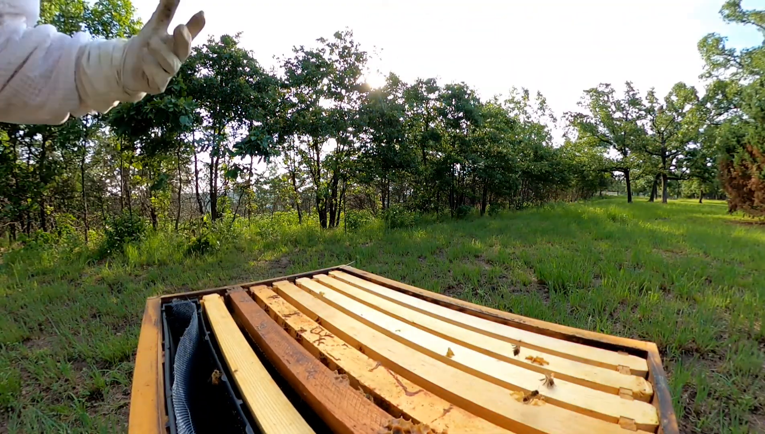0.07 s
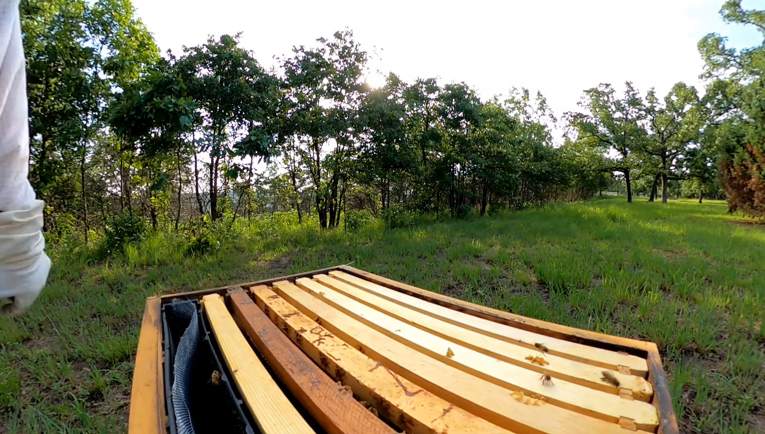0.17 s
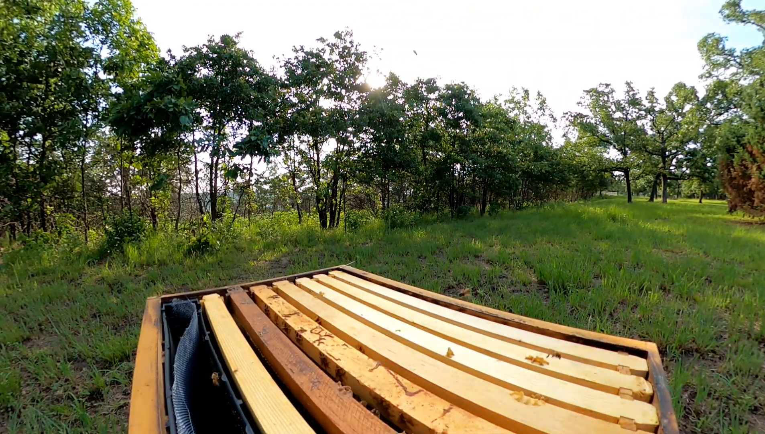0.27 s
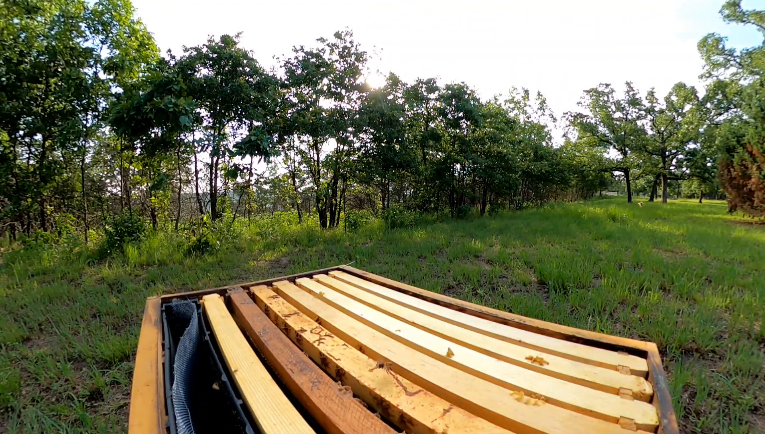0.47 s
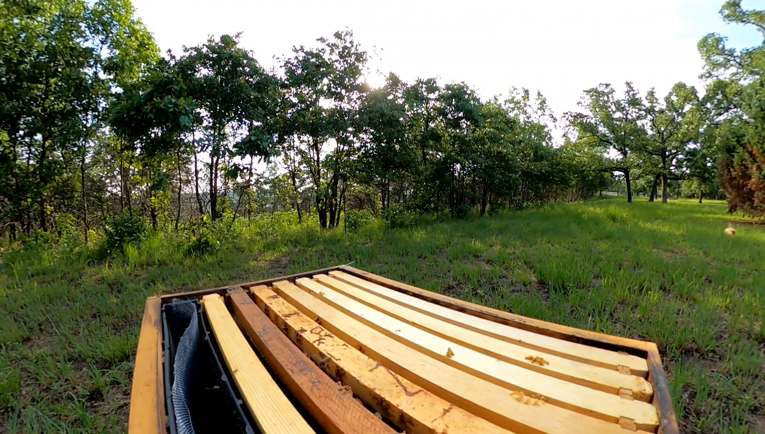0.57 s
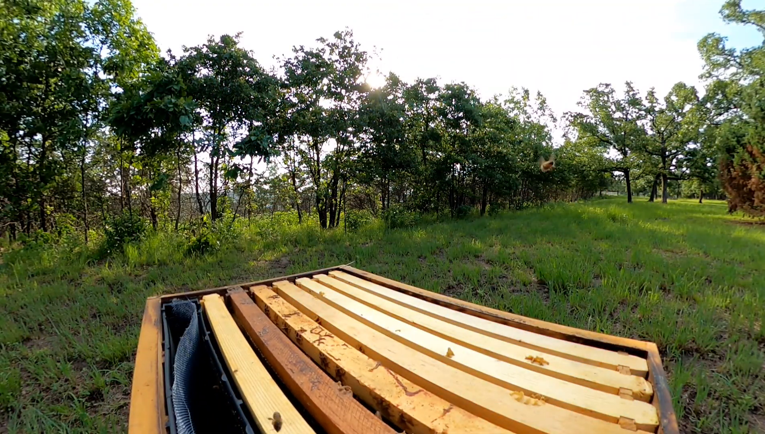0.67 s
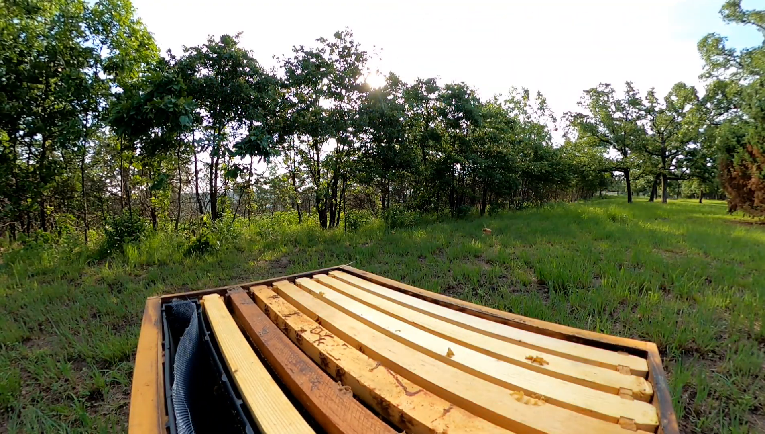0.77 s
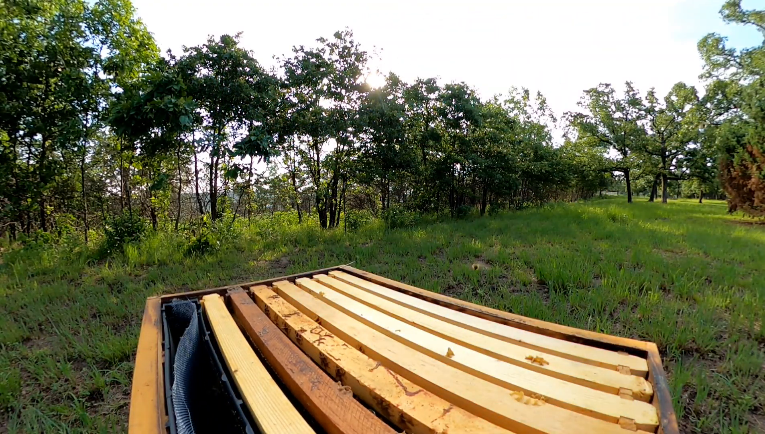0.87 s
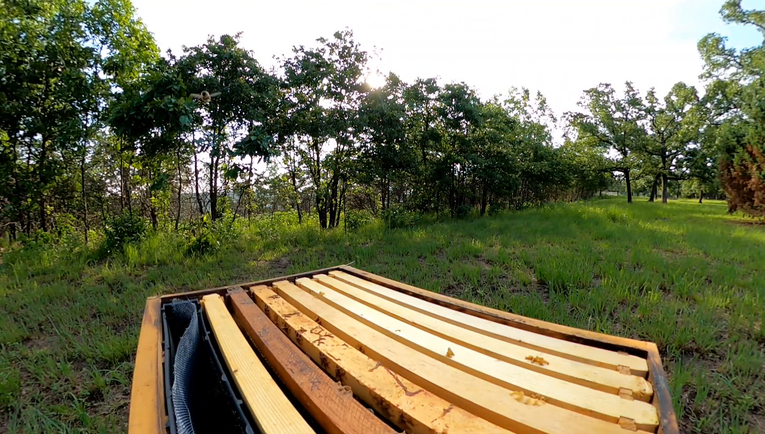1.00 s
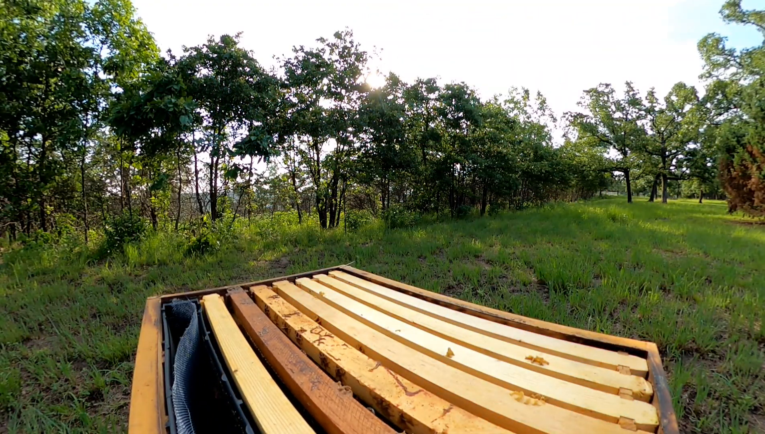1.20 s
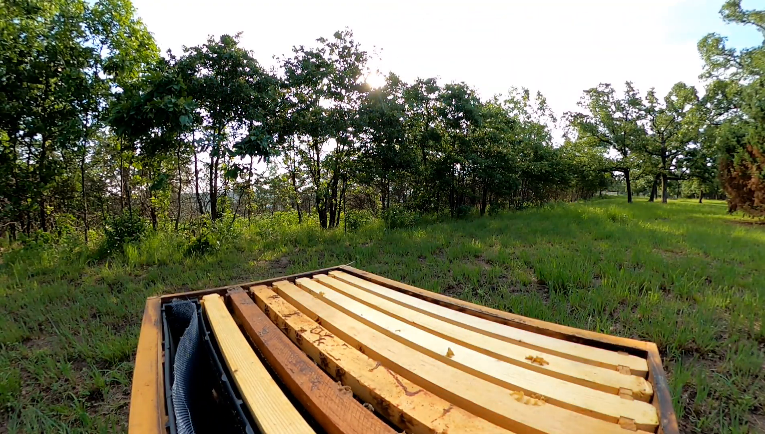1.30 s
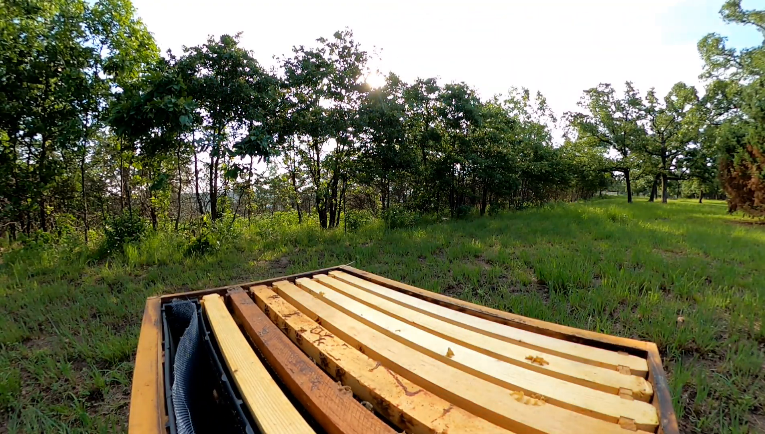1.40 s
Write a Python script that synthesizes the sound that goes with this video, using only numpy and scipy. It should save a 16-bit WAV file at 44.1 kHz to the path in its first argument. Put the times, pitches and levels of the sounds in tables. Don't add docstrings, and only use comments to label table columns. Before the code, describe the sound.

A dense swarm of bees hums and buzzes at an open hive; early on a wooden part lands with a tick and hard hollow knock, then quieter buzzing with faint clicks, outdoors, microphone on the hive rim.

```python
import sys
import numpy as np
from scipy import signal
from scipy.fft import rfft, irfft, next_fast_len
from scipy.io import wavfile
from scipy.ndimage import uniform_filter1d, map_coordinates

SR = 44100
rng = np.random.default_rng(int(sys.argv[2]) if len(sys.argv) > 2 else 0)


def magnitude_from_level(level_db):
    exponent = np.asarray(level_db, float) / 20
    return 10 ** exponent


def wav_record(signal):
    frames = np.transpose(np.atleast_2d(signal))
    bounded = np.clip(frames, -1, 1)
    quanta = np.round(bounded * 32767).astype(np.int16)
    wavfile.write(sys.argv[1], SR, quanta)


N = 63945
NOW = np.arange(N) / SR
CLICK_RISE_S = 0.0005


def unit(x):
    return x / np.sqrt(np.mean(x ** 2, -1, keepdims=True) + 1e-20)


def along(points, hz):
    f, v = np.transpose(points)
    return np.interp(np.log(hz + 1), np.log(f + 1), v)


def curves(rows):
    s, *cols = np.transpose(rows)
    return [np.interp(NOW, s, c) for c in cols]


def wobble(rate):
    return map_coordinates(rng.standard_normal(200), [np.arange(N) * min(rate, 120) / SR])


def filtered(x, response):
    m = next_fast_len(x.shape[-1] + 8192)
    return irfft(rfft(x, m) * response(np.fft.rfftfreq(m, 1 / SR)), m)[..., :x.shape[-1]]


def rush(spectrum, patchy_db):
    z = signal.stft(rng.standard_normal(N), nperseg=512)[2]
    field = uniform_filter1d(rng.standard_normal(z.shape), 8, 0)
    field = uniform_filter1d(field, 10, 1)
    x = signal.istft(z * magnitude_from_level(patchy_db * field / field.std()), nperseg=512)[1][:N]
    return unit(filtered(x, lambda hz: magnitude_from_level(along(spectrum, hz))))


# frequency in Hz, density in dB per Hz.
AIR = [(350, -29), (600, -1), (642, -2), (766, -0.5), (1230, -1), (1760, -9.5), (5360, -24.5),
       (13200, -39.5), (15500, -71)]


def air():
    return magnitude_from_level(6 + 1.2 * wobble(24.8)) * rush(AIR, patchy_db=0.7)


# frequency in Hz, density in dB per Hz.
MURMUR = [(120, -34), (200, 4.5), (320, 2), (440, 9.5), (580, -3.5), (700, -46)]


def murmur():
    return magnitude_from_level(8.5) * rush(MURMUR, patchy_db=3.0)


# frequency in Hz, density in dB per Hz.
RUMBLE = [(12, -39), (22, 0), (54, -0.5), (107, -5.5), (160, -6.5), (210, -14.5), (350, -120)]
# time in seconds, level in dB.
WIND = [(0, -1.5), (.14, -2.5), (.3, 0), (.44, 7.5), (.51, -4), (.62, 2), (.67, -6.5), (.76, 4.5),
        (.86, -0.5), (.98, 0.5), (1.08, 0), (1.2, -4), (1.32, 5), (1.45, -7)]


def rumble():
    gusts_db, = curves(WIND)
    return magnitude_from_level(4.5 + gusts_db + 1.2 * wobble(11.1)) * rush(RUMBLE, patchy_db=2.2)


# multiple of the wing rate, level in dB.
WING = [(1, -1), (2, 3), (3, -15), (4, -29), (5, -19), (6, -11), (7, -18), (8, -23), (10, -29), (14, -51),
        (24, -61)]


def wings(hz, rough, root_db=0):
    turn = 2 * np.pi * np.cumsum(hz * (1 + rough * wobble(60))) / SR
    k = np.arange(1, 25)
    level_db = np.interp(k, *np.transpose(WING)) + root_db * (k == 1)
    level = magnitude_from_level(level_db + 1.5 * rng.standard_normal(len(k)))
    return unit(level @ np.sin(k[:, None] * turn + 2 * np.pi * rng.random((len(k), 1))))


def swarm(count):
    low_hz, high_hz = 166.05, 288.36
    drift, flutter = 0.03, 0.016
    total = 0
    for hz in low_hz + (high_hz - low_hz) * (np.arange(count) + rng.random(count)) / count:
        bee = wings(hz * (1 + drift * wobble(3.5)), flutter)
        total = total + bee * magnitude_from_level(3.5 * wobble(5.28) + 4.5 * wobble(34.7))
    return unit(total)


# time in seconds, twice the wing rate in Hz, level in dB.
HOVER = [(0, 415, -45), (.04, 425, -39), (.1, 418, -42), (.17, 412, -38), (.23, 410, -42), (.32, 420, -45),
         (.38, 420, -46), (.44, 430, -43), (.5, 408, -49), (.58, 440, -52), (.7, 418, -48), (.8, 440, -49),
         (.9, 436, -49), (1.0, 445, -49), (1.08, 435, -52), (1.2, 452, -50), (1.29, 448, -49),
         (1.45, 440, -52)]


def hovering_bee():
    twice_hz, level_db = curves(HOVER)
    return wings(twice_hz / 2, 0.006, root_db=-11) * magnitude_from_level(level_db + 2.5 * wobble(45.05))


# time in seconds, wing rate in Hz, level in dB.
EARLY = [(0, 205.7, -56), (.06, 198.3, -48.5), (.12, 178.3, -44), (.17, 170.4, -47), (.22, 165, -56)]
# time in seconds, wing rate in Hz, level in dB.
PASSER = [(.52, 221, -55), (.6, 230.4, -45), (.7, 274, -52.5), (.76, 288.5, -44), (.8, 255, -46.5),
          (.87, 241.2, -70)]
# start in seconds, length in seconds, wing rate in Hz from and to, peak in dB.
FLYBYS = [
    (0, 0.1, 171, 146, -43),
    (0.112, 0.11, 182.4, 230, -60),
    (.56, 0.39, 216.2, 252, -53),
    (0.672, 0.16, 202.3, 165, -52),
    (1.031, 0.151, 247, 240, -54),
    (1.26, .16, 259.5, 236, -50),
    (.9, 0.18, 246.2, 220, -56.5),
]


def flying_bees():
    total = 0
    for path, root_db in [(PASSER, 5), (EARLY, -12)]:
        hz, level_db = curves(path)
        total = total + wings(hz, 0.0235, root_db) * magnitude_from_level(level_db + 2.3 * wobble(40.03))
    for s, length, from_hz, to_hz, db in FLYBYS:
        u = np.clip((NOW - s) / length, 0, 1)
        bee = wings(from_hz + (to_hz - from_hz) * u, 0.0115, root_db=7)
        total = total + magnitude_from_level(db) * np.sin(np.pi * u) * bee
    return total


# time in seconds, level in dB.
SCRAPE = [(0, -56), (.2, -55), (.26, -56), (.3, -53), (.4, -58), (.5, -72), (.68, -72), (.71, -56),
          (.76, -53), (.81, -54), (.87, -72), (1.08, -72), (1.14, -60), (1.2, -72)]


def cloth_rustle():
    spectrum = [(300, -27), (700, 10.0), (1800, 15), (3800, 3.5), (7000, -6.5), (14500, -29.0)]  # Hz, dB
    level_db, = curves(SCRAPE)
    return magnitude_from_level(level_db + 1.8 * wobble(70.1)) * rush(spectrum, patchy_db=4.0)


# time in seconds, gain in dB.
GAIN = [(0.0, -51), (0.176, -50.5), (0.334, -54), (0.516, -57.5), (1.046, -58.5), (1.45, -58)]
# time in seconds, side level in dB.
WIDTH = [(0, -1), (.3, -0.5), (.55, -6.5), (.7, -8.5), (.85, -17), (1.1, -25), (1.45, -33)]
# frequency in Hz, side over mid in dB.
SIDE_DB = [(60, -17), (110, -21), (200, -20.5), (380, -35), (700, -73), (1290, -9.5), (2380, -7.5),
           (4400, -6.5), (8120, -2), (15000, -19)]


def meadow():
    gain_db, = curves(GAIN)
    width_db, = curves(WIDTH)
    mid = magnitude_from_level(gain_db) * (air() + murmur() + rumble() + magnitude_from_level(10) * swarm(count=22))
    mid = mid + hovering_bee() + flying_bees() + cloth_rustle()
    side = magnitude_from_level(gain_db + width_db + 2.5) * (air() + murmur() + rumble())
    side = filtered(side, lambda hz: magnitude_from_level(along(SIDE_DB, hz)))
    return np.array([mid + side, mid - side])


def swing(s, db, hz, t60):
    return -magnitude_from_level(db - 60 * np.abs(NOW - s) / t60) * np.sin(2 * np.pi * hz * (NOW - s)) * (NOW > s)


# time in seconds, level in dB, frequency in Hz, t60 in seconds.
THUMP = (.1915, -23, 74, .13)


def foot_thump():
    return swing(*THUMP)


# frequency in Hz, level in dB, t60 in seconds.
BOX = [(59.7, -2, 0.087), (142, 3, 0.094), (169, -4, 0.065), (245.3, -3.5, 0.0713), (371, 0, 0.053),
       (431.2, -8.5, 0.091), (564, -9, 0.071), (698, -14.5, 0.03), (820, -14.5, 0.053), (877, -14.5, 0.06),
       (1006, -19.5, 0.034), (1110, -6.5, 0.022), (1565, -11.5, 0.014), (1893, -15, 0.033)]
# time in seconds, strength in dB, contact in milliseconds.
BLOWS = [
    (.1928, -21.5, 0.06),
    (0.2, -25, 2.8),
    (0.2215, -5.5, 2.76),
    (0.2331, -13.5, 5.1),
    (.2462, -15.5, 0.58),
    (.2482, -14.5, 0.93),
    (0.2513, -3, 0.84),
    (0.284, -15, 4.2),
    (.334, -24.5, 6.1),
]


def knocks():
    out, t = np.zeros((2, N)), np.arange(SR // 3) / SR
    hz, level, t60 = np.transpose(BOX)[:, :, None]
    skew = magnitude_from_level(-19) * (-1) ** np.arange(len(BOX))[:, None]
    build = 1 - np.exp(-t * hz / 0.76)
    for s, db, ms in BLOWS:
        push = np.sin(np.pi * np.clip(t[:400] / (ms / 1000), 0, 1)) ** 2
        size = -magnitude_from_level(level + rng.normal(0, 0.75, hz.shape) - 60 * t / t60) * build
        mid = (size * np.sin(2 * np.pi * hz * t)).sum(0)
        side = (skew * size * np.cos(2 * np.pi * hz * t)).sum(0)
        ring = signal.lfilter(push / push.sum(), 1, [mid + side, mid - side])
        out[:, round(s * SR):][:, :len(t)] += magnitude_from_level(db) * ring
    return out


# time in seconds, peak in dB, colour in Hz, t60 in milliseconds, left over right in dB.
CLICKS = [(.1930, -30, 2500, 9, -2.5), (.1932, -40, 4000, 9, -2), (.2458, -53, 7500, 50, 0),
          (.2468, -40, 3200, 40, -1), (.2500, -24, 1700, 24, 0), (.2503, -27, 2500, 20, -1.5),
          (.2506, -26, 4400, 14, -1.5), (.2507, -31, 6000, 14, -1), (.2508, -39, 12800, 6, 0),
          (.2535, -35, 3000, 30, -1), (.278, -52, 5500, 200, 0), (.443, -54, 7000, 15, 0),
          (.5672, -42, 2700, 26, -2.5), (.5673, -43, 3600, 26, -2.5), (.5674, -45, 6000, 20, -2.5),
          (.568, -51, 12800, 8, 0), (.7088, -45, 2900, 16, .5), (.9416, -54, 2500, 15, 0),
          (.99, -55, 6000, 25, 0), (1.3468, -50, 1800, 15, 0)]


def clicks():
    out, t = np.zeros((2, N)), np.arange(2000) / SR
    for s, db, hz, ms, left_db in CLICKS:
        width = 0.4 * (4000 / hz) ** 0.2
        noise = rng.standard_normal((2, len(t)))
        noise = unit(filtered(noise, lambda f: np.exp(-(np.log((f + 1) / hz) / width) ** 2)))
        shape = magnitude_from_level(db - 3 - 60 * t / (ms / 1000)) * (1 - np.exp(-t / CLICK_RISE_S))
        mid, side = unit(shape * noise) * np.sqrt(np.mean(shape ** 2)) * [[1], [0.55]]
        balance = magnitude_from_level(np.array([[left_db / 2], [-left_db / 2]]))
        out[:, round(s * SR):][:, :len(t)] += balance * [mid + side, mid - side]
    return out


# time in seconds, peak in dB, frequency in Hz, t60 in milliseconds, side over mid in dB.
PINGS = [
    (.1931, -16, 1350, 7, -10),
    (.2468, -15, 1120, 13, -9),
    (.2488, -18, 830, 22, -8),
    (.2508, -36, 11600, 7, -12),
    (.2544, -30, 1500, 18, 8),
]


def pings():
    out = np.zeros((2, N))
    for s, db, hz, ms, side_db in PINGS:
        u = np.clip(NOW - s, 0, None)
        shape = magnitude_from_level(db - 60 * u / (ms / 1000)) * (1 - np.exp(-u / CLICK_RISE_S))
        turn = 2 * np.pi * hz * u
        out += shape * (-np.sin(turn) + magnitude_from_level(side_db) * np.cos(turn) * [[1], [-1]])
    return out


# time in seconds, level in dB, frequency in Hz, t60 in seconds.
JOLTS = [
    (0.2488, -5, 191, 0.021),
    (0.198, -33.5, 90, 0.2),
    (.3, -30.5, 71.1, 0.22),
    (0.476, -56, 60.3, 0.15),
    (0.569, -39, 92, 0.047),
    (0.618, -44, 80.6, 0.071),
]


def jolts():
    x = sum(swing(*row) for row in JOLTS)
    return np.array([x, -x])


# time in seconds, frequency in Hz, level in dB, half length in seconds.
SQUEAK = (.545, 13800, -68, .006)


def squeak():
    s, hz, db, half = SQUEAK
    return magnitude_from_level(db) * np.exp(-((NOW - s) / half) ** 2) * np.sin(2 * np.pi * hz * NOW)


def scene():
    return meadow() + foot_thump() + knocks() + clicks() + pings() + jolts() + squeak()


# frequency in Hz, response in dB.
MIC = [(15, -8), (35, -5.5), (55, -1.5), (9000, 0.5), (12000, -2), (14000, -6), (15600, -17)]


def microphone(dry):
    return filtered(dry, lambda hz: magnitude_from_level(along(MIC, hz)) * (hz < 15650))


def low_pass(x):
    return signal.sosfilt(signal.butter(12, 15640, fs=SR, output="sos"), x)


def record(dry):
    mix = microphone(dry)
    return low_pass(mix)


dry = scene()
out = record(dry)
wav_record(out)
```